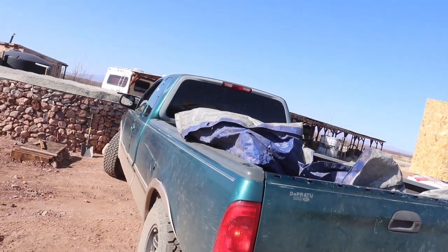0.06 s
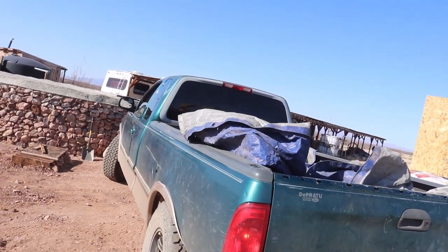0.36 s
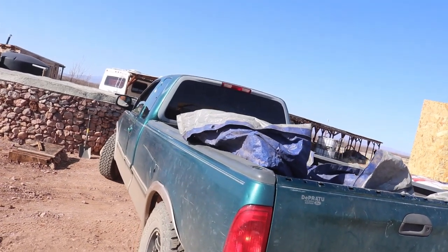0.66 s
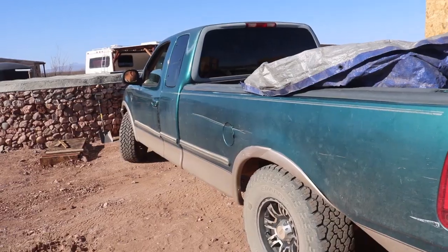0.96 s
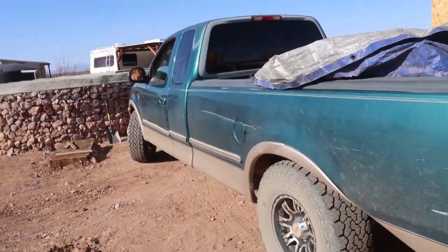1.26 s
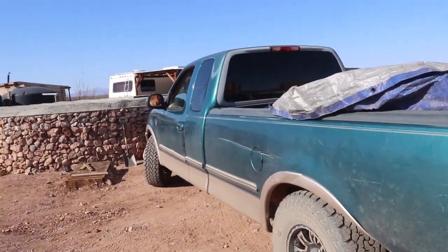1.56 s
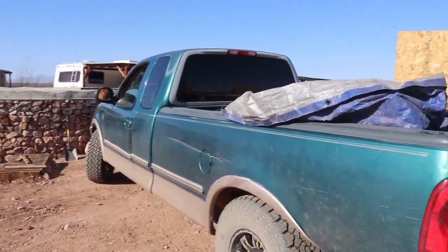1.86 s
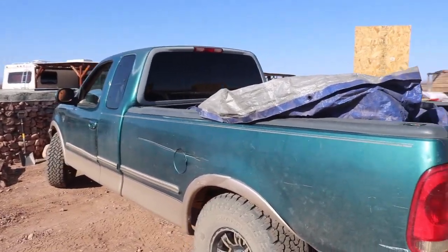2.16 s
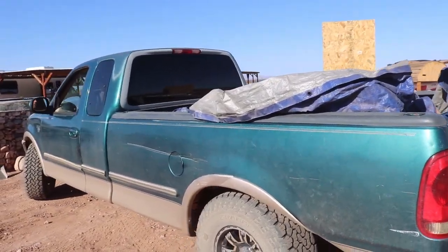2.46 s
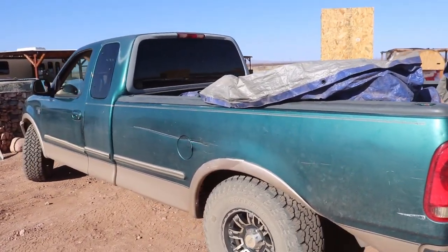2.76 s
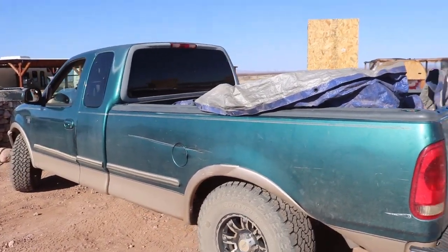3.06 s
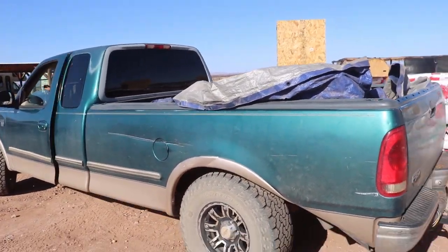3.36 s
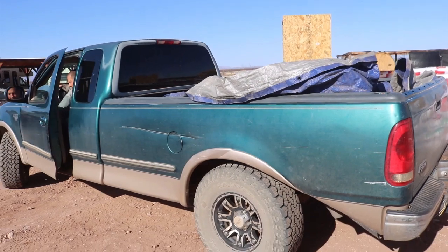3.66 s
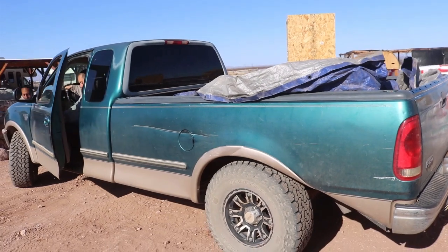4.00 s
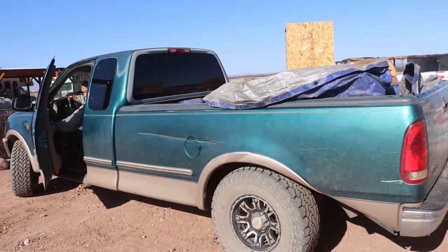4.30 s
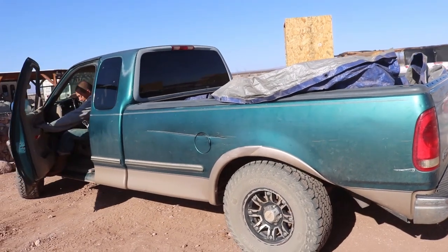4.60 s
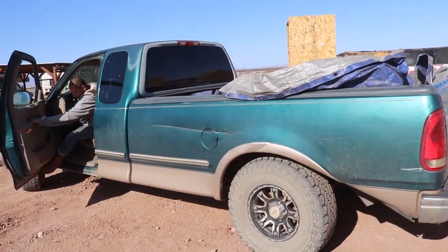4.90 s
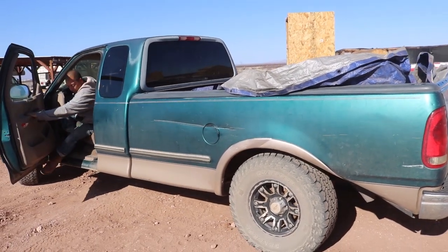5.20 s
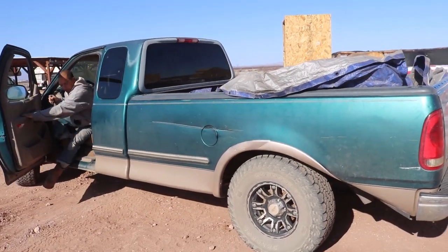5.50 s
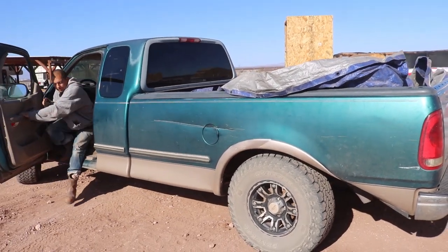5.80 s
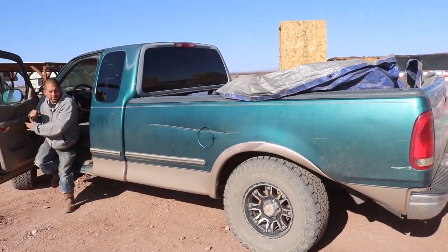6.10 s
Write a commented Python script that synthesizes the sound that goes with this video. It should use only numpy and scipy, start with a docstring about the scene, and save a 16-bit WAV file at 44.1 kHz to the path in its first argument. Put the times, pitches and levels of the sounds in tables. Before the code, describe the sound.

A pickup's V8 idles and shuts off, then the door clicks open and the driver climbs out with knocks and rustling.

```python
"""A pickup stops and the driver gets out

A V8 idles in a desert yard, its exhaust puffs ringing the tailpipe, heard from behind and then
suddenly from the side. Switched off, it shudders to rest. The door unlatches and its hinge squeaks.
The driver slides out with knocks, rubbing clothes and jingling keys as wind brushes the microphone."""
import sys
import numpy as np
from scipy import signal
from scipy.io import wavfile
from scipy.ndimage import uniform_filter1d

SR = 44100
rng = np.random.default_rng(int(sys.argv[2]) if len(sys.argv) > 2 else 0)


def to_wav(s):
    """Save 16-bit WAV."""
    ch = np.atleast_2d(s).T  # columns
    pcm = np.round(np.clip(ch, -1, 1) * 32767)  # PCM
    wavfile.write(sys.argv[1], SR, pcm.astype(np.int16))


N = 275625
TIME = np.arange(N) / SR

# Levels are relative. A ring_s or decay_s is the time a sound takes to fade by 60 dB.
# Tone of the quiet yard, and of the wind's rumble: frequency_hz, level_db
YARD_TONE = [(15, -22.5), (25, -15.5), (80, -9.5), (134, -16), (206, -16.5), (560, -17), (695, -23.5),
             (796, -19.5), (962, -22), (1160, -27), (2220, -29), (2910, -28.5), (4030, -36.5), (16000, -41)]
WIND_TONE = [(12, -36), (20, -9.5), (32, 3.5), (51, 1), (76, 0.5), (173, -11.5), (340, -34.5), (520, -58.5)]
# Gusts on the microphone: peak_s, half_length_s, level_db
GUSTS = [(3.9, 0.061, -50), (5.203, 0.092, -27), (5.33, 0.022, -34), (5.43, 0.066, -32.5),
         (5.77, 0.18, -40.5), (6.045, 0.19, -44), (6.24, 0.09, -36)]

# The driver turns, pushes the door, shifts and steps down: peak_s, half_length_s, scuff_db, hiss_db
MOVES = [(3.086, 0.1, -44.5, -72), (3.37, 0.18, -47.5, -79), (3.677, 0.058, -41, -50.5),
         (4.241, 0.021, -45, -48), (4.45, 0.19, -45, -55.5), (4.61, 0.033, -56, -43.5),
         (4.774, 0.1, -39.5, -46.5), (4.935, 0.084, -47.5, -53.5), (5.325, 0.19, -47, -52.5),
         (5.993, 0.24, -42.5, -49)]
# Tone of scuffing on the seat, and of hissing cloth: frequency_hz, level_db
SCUFF_TONE = [(88, -40), (150, 1.5), (254, -2.5), (403, -5), (1430, -18.5), (1620, -32.5), (3040, -16),
              (3780, -47), (4270, -37), (6000, -70), (7800, -63), (13200, -120)]
CLOTH_TONE = [(2000, 18), (3500, 11.5), (7000, 5), (11000, -1.5), (16000, -10)]
# Keys touching: start_s, level_db, ring_offset_db, pitch_hz
KEY_TOUCHES = [(3.488, -35.5, -24, 11600), (5.174, -37, -18, 13900), (5.193, -38, -7, 13800),
               (5.254, -39, -6, 13300), (5.271, -45, -1, 13300), (5.305, -37, -16, 12900),
               (5.358, -42, -9, 11900), (5.478, -36, -10, 8600), (5.488, -31, -12, 12450)]
# A key's modes (the notes it rings with): pitch_multiple, level_db, ring_s
KEY_MODES = [(1, -3, 0.075), (.41, -10, .05), (.52, -6.5, 0.061), (.68, -10, .06), (.88, -11, .06)]

# Dull blows on the cab: start_s, level_db, cutoff_hz, panel_pitch_hz
THUMPS = [(2.576, -19, 206, 147.4), (2.644, -28.5, 230, 137), (3.253, -25, 300, 140),
          (3.375, -21.5, 190, 168), (4.366, -23, 169, 128), (4.425, -26, 260, 155),
          (4.706, -7.5, 490, 136.8), (4.714, -11, 304, 128.7), (4.855, -15, 190, 129),
          (4.983, -22, 119, 126), (6.131, -21, 330, 143.6)]
# Modes of a cab panel: pitch_multiple, level_db, ring_s
CAB_MODES = [(.68, -11, 0.12), (1, 2, 0.12), (1.36, -4, 0.058), (1.96, -8, 0.11), (2.26, -16, 0.075),
             (3.2, -25, 0.23), (4.7, -6.5, 0.045), (6.24, -15, 0.082)]
# Clacks of grit, latch, door stay, trim and boots:
# start_s, level_db, decay_s, ring_hz, ring_offset_db, snap_offset_db, snap_cutoff_hz
CLACKS = [(0.471, -34, 0.038, 2780, 5, -16.5, 5000), (1.3226, -10, 0.012, 1120, 3, 1, 12000),
          (1.326, -26, 0.0067, 1200, 2, -2, 14000), (1.872, -32.5, 0.06, 1380, -4, -14, 6000),
          (1.954, -34, 0.068, 1160, -6, -20, 6000), (2.077, -34.5, 0.039, 850, -11, -24, 6100),
          (3.073, -30.5, 0.16, 1450, -4, -8.5, 7000), (3.1, -25, 0.11, 2900, -8.5, -9, 4500),
          (3.253, -37.5, 0.3, 510, 4, -16, 5960), (3.283, -27, 0.055, 2700, -3, -5, 9000),
          (3.288, -37.5, 0.12, 590, 6.5, -11, 6000), (3.659, -21, 0.12, 406, -2, -8, 9000),
          (3.665, -27.5, 0.097, 3280, -13, -1, 13000), (3.69, -34, 0.055, 2260, 2, -2, 10000),
          (3.707, -44, 0.03, 3000, -2, -4, 6000), (3.72, -38, 0.03, 3100, -6, -6, 5000),
          (3.773, -30.5, 0.052, 1730, -5.5, -21, 4000), (3.803, -38, 0.027, 2800, 0, -8, 5000),
          (3.929, -44, 0.092, 2960, -3.5, -2, 5000), (4.229, -42.5, 0.18, 3170, -8, -5, 4500),
          (4.322, -26, 0.052, 460, -3, -9, 6000), (4.328, -22.5, 0.1, 2010, -9, -16, 6000),
          (4.346, -29.5, 0.065, 960, -4, -10, 6000), (4.361, -33.5, 0.06, 428, -10, -7, 7000),
          (4.422, -25, 0.038, 950, -5, -22, 4000), (4.468, -38.5, 0.07, 1070, -4, -24, 4000),
          (4.51, -35, 0.05, 620, 1, -20, 4000), (4.518, -32, 0.05, 1300, -3, -14, 5000),
          (4.558, -35.5, 0.063, 1030, 4, -3, 7000), (4.569, -31, 0.13, 810, -2, -12, 6000),
          (4.706, -31.5, 0.12, 770, 4.5, -28, 5000), (4.715, -34, 0.1, 2450, -18, -9, 7000),
          (4.737, -28.5, 0.06, 1173, -1, -12, 7000), (4.753, -30.5, 0.12, 2700, -13, -13, 9000),
          (4.848, -32, 0.16, 550, -3.5, -27, 7000), (5.274, -31.5, 0.12, 1370, -3, -24, 5000),
          (5.466, -27, 0.063, 935, -6.5, -26, 5000), (5.913, -35, 0.028, 1930, -2, -22, 4000),
          (5.942, -28.5, 0.027, 403, -2.5, -20, 4000), (5.954, -32, 0.045, 970, 8.5, -26, 4000),
          (6.081, -24, 0.072, 1550, -14, -14, 6000), (6.096, -41, 0.16, 403, 11, -24, 4000),
          (6.131, -38.5, 0.027, 1090, -1, -24, 4000)]
# The door's noisy answer to a clack: frequency_hz, level_db, decay_multiple
DOOR_TONE = [(88.6, 14, 1.5), (184, -12.5, 1.5), (360, 10, 1.3), (785, 1.5, 1.1), (1670, -8, 1),
             (2130, -11, 1), (3020, -5.5, 1), (4600, -63, .9), (8000, -52, .8)]
# Tone of hard edges snapping together: frequency_hz, level_db
SNAP_TONE = [(2000, 13), (3500, 9.5), (6000, 6.5), (9000, 4.5), (12500, -4), (16000, 2)]
# The latch lets go and the stay (the arm that holds the door open) catches: start_s, level_db
DOOR_KNOCKS = [(3.659, -22.5), (3.671, -27.5), (4.323, -26)]
# Modes of the hollow door: pitch_hz, level_db, ring_s
DOOR_MODES = [(130, -23, 0.5), (262, -9, 0.27), (330.4, -4.5, 0.24), (412, -1, 0.13), (465, -11, 0.15),
              (555, -24, 0.061)]
# Rattles of the steel latch and stay: start_s, level_db, pitch_hz
RATTLES = [(3.103, -34, 2980), (3.292, -29, 3140), (3.662, -24, 2970), (4.329, -41, 3150),
           (4.352, -33, 3290), (4.516, -43, 3210), (4.752, -49, 2880)]
# Modes of those steel parts: pitch_multiple, level_db, ring_s
STEEL_MODES = [(.7, -11, 0.025), (.88, -11, .025), (1, -5, 0.04), (1.08, -9, 0.024), (1.34, -18, .025),
               (1.7, -19, 0.025), (2.06, -19, 0.025)]

# Jolts as the engine stalls and settles: start_s, level_db
SHUDDERS = [(1.536, -3.5), (1.58, -4), (1.639, -2.5), (1.7, -7), (1.727, -7.5), (1.784, -9.5), (1.898, -15),
            (1.96, -22), (2.006, -17.5), (2.09, -26.5), (2.419, -33.5)]
# Modes of the shaken truck: pitch_hz, level_db, ring_s
TRUCK_MODES = [(55.2, -8.5, 0.8), (99.4, -2, 0.14), (121, -8, 0.049), (229, -16, 0.16), (379, -9, 0.099)]
# Tone of the whirr under the bonnet: frequency_hz, level_db
WHIRR_TONE = [(350, -40), (600, 3), (961, -5), (1150, -9), (1360, 0.5), (1580, -13), (2340, -1.5),
              (2820, -17.5), (3190, -16), (3600, -20.5), (4460, -43.5), (8640, -98), (15000, -59.5)]
# The tailpipe's three honks in each engine cycle: delay_s, pitch_hz, behind_db, beside_db
HONKS = [(-.036, 420, -21.5, -30), (.007, 376, -14, -15.5), (.05, 520, -25.5, -26)]
# The eight cylinders in firing order, from each listening spot. A puff has a low boom, a middle
# bark and a higher rasp: lateness_in_firing_gaps, boom_db, bark_db, rasp_db
CYLINDERS_BEHIND = [(0.07, 8.5, 1.7, 1.4), (0.32, -0.8, 4.4, 4.8), (0.09, 6.5, 2.5, 2.1),
                    (-0.07, -9.4, -4.4, -2.3), (0.01, -11.3, 5.7, 5.5), (-0.03, 6.5, -3.2, -2.5),
                    (0.04, -20.7, 0.9, 1.9), (0.04, 1.4, 0.8, 1.1)]
CYLINDERS_BESIDE = [(0.04, 9.3, 3.84, -6.68), (0.16, -2.21, 1.79, 1.11), (0.15, 1.74, -0.26, 1.4),
                    (0.07, 8.21, -0.09, 9.68), (-0.46, -6.1, -11.29, 6.91), (0.04, -0.48, 0.22, -1.57),
                    (-0.05, 2.36, 2.58, -3.56), (0.04, -12.82, 3.21, -7.29)]
# Exhaust pipe resonances from each spot: pitch_hz, width_hz, level_db, part (0 boom, 1 bark, 2 rasp)
PIPE_BEHIND = [(73.2, 16.3, 1.5, 0), (81.8, 30, -11, 0), (123.1, 14.5, 13.5, 0), (122.4, 33, 5, 0),
               (169.7, 19, -8, 1), (230.1, 6.9, -6, 1), (342.9, 29.2, 12, 1), (340.8, 40.4, 10.5, 1),
               (412.6, 44.7, 9, 1), (410.2, 42.5, 8.5, 1), (488, 19, -10.5, 2)]
PIPE_BESIDE = [(76, 35, -8, 0), (133, 19.2, 1.5, 0), (183, 44, -13.5, 0), (206.8, 30.4, 0, 1),
               (312.7, 18.4, -1, 1), (331, 15.7, -2, 1), (407, 19.3, -6, 1), (495.5, 25, -7, 2),
               (565, 70, -25, 2)]

IDLE_BEHIND_HZ, IDLE_BESIDE_HZ = 7.395, 8.43  # engine cycles a second, eight puffs in each
MOVE_BESIDE_S, IGNITION_OFF_S, DOOR_OPEN_S = 0.8666, 1.42, 4.2
FADE_60_DB = -np.log(1000)  # exp() of this is a drop of 60 dB


def from_db(db):
    """Turn decibels into a number to multiply by."""
    return 10 ** (np.asarray(db) / 20)


def unit_level(x):
    """Scale a signal to an average (rms) level of 1."""
    return x / np.sqrt(np.mean(x ** 2) + 1e-20)


def at_hz(table, hz, column=1):
    """Read between a table's rows, spacing frequencies by octaves."""
    table = np.array(table)
    return np.interp(np.log(hz), np.log(table[:, 0]), table[:, column])


def drift(rate_hz):
    """A random wobble of about 1 up and down."""
    return unit_level(np.interp(TIME * rate_hz, np.arange(4096), rng.standard_normal(4096)))


def swell(peak_s, rise_s, fall_s):
    """A smooth rise to 1 and a smooth fall."""
    distance = (TIME - peak_s) / np.where(TIME < peak_s, rise_s, fall_s)
    return np.exp(-np.minimum(distance ** 2, 20))


def filtered(x, hz, kind, order=2):
    """Keep the "low" part, the "high" part or one "band" of a sound."""
    sections = signal.butter(order, np.clip(hz, 10, .45 * SR), kind, fs=SR, output="sos")
    return signal.sosfilt(sections, x + 1e-18)


def bands(low_hz, high_hz):
    """Half-octave slices of noise, each paired with its centre frequency."""
    white = rng.standard_normal((2, N))
    edges = 17 * 2 ** np.arange(0, 10.5, .5)
    return [(np.sqrt(low * high), filtered(white[k % 2], [low, high], "band"))
            for k, (low, high) in enumerate(zip(edges, edges[1:])) if high > low_hz and low < high_hz]


def noise(tone, flicker_db):
    """Noise shaped by a tone table; each band can flicker on its own."""
    return unit_level(sum(band * from_db(at_hz(tone, hz) + flicker_db * drift(25))
                          for hz, band in bands(tone[0][0], tone[-1][0])))


def resonate(x, hz, width_hz):
    """Make a sound ring at one pitch; a narrower width rings longer."""
    r = np.exp(-np.pi * width_hz / SR)
    feedback = [1, -2 * r * np.cos(2 * np.pi * hz / SR), r * r]
    return signal.lfilter(np.array([1, 0, -1]) * (1 - r * r) / 2, feedback, x + 1e-18)


def pitched_noise(hz, width_hz, length=N):
    """Noise narrowed twice around one pitch."""
    return resonate(resonate(rng.standard_normal(length), hz, width_hz), hz, width_hz)


def tuned(modes, pitch_hz, detune=0):
    """Set a part's modes to a pitch; where it is touched shifts all but the main one."""
    return [(pitch_hz * multiple * (1 + (multiple != 1) * detune * rng.normal()), db, ring_s)
            for multiple, db, ring_s in modes]


def strike(modes, level_db, vary_db=1.5):
    """A struck object rings with fading notes, in a slightly new balance each time."""
    t = np.arange(SR // 2) / SR
    return sum(from_db(level_db + db + vary_db * rng.normal())
               * np.exp(FADE_60_DB * t / ring_s) * np.sin(2 * np.pi * hz * t)
               for hz, db, ring_s in modes)


def add(track, start_s, sound):
    """Mix a sound into a track at a given time."""
    start = int(start_s * SR)
    track[start:start + len(sound)] += sound[:max(N - start, 0)]


def air(breeze_db=-55.5, whine_hz=959):
    """The quiet yard, gusts of wind, and a faint whine after the engine stops."""
    whine = unit_level(resonate(resonate(rng.standard_normal(N), whine_hz, 35), whine_hz, 24.5))
    whine *= from_db(-61) * swell(peak_s=2.8, rise_s=.24, fall_s=.4)
    yard = from_db(-50.5) * noise(YARD_TONE, flicker_db=0)
    gusts = sum(from_db(db) * swell(peak_s, half_s, half_s) for peak_s, half_s, db in GUSTS)
    wind = (from_db(breeze_db) + gusts) * noise(WIND_TONE, flicker_db=3)
    return yard + wind + whine


def with_wall_echo(x, delay_s=0.037, echo_db=-19):
    """A stone wall sends back one dull echo."""
    delayed = np.interp(TIME - delay_s, TIME, x, left=0)
    return x + from_db(echo_db) * filtered(delayed, 3000, "low")


def movement():
    """How strongly the driver's clothes scuff and hiss as each move swells and fades."""
    return sum(np.outer(from_db([scuff_db, hiss_db]), swell(peak_s, half_s, half_s))
               for peak_s, half_s, scuff_db, hiss_db in MOVES)


def clothes():
    """Clothes drag over the seat in uneven little catches."""
    scuff, hiss = movement()
    scuff *= noise(SCUFF_TONE, flicker_db=1.5)
    hiss *= from_db(-4) * noise(CLOTH_TONE, flicker_db=3)
    catches = from_db(2.0 * drift(200) + 4.2 * drift(30))
    return (scuff + hiss) * catches


def keys(tick_db=-11, tick_decay_s=.05):
    """Keys touch with a dry tick and a small, bright ring."""
    out, t = np.zeros(N), np.arange(SR // 2) / SR
    for start_s, db, ring_db, pitch_hz in KEY_TOUCHES:
        tick = filtered(rng.standard_normal(len(t)), 2430, "high") * np.exp(FADE_60_DB * t / tick_decay_s)
        ring = strike(tuned(KEY_MODES, pitch_hz, detune=.06), db + ring_db, vary_db=2)
        add(out, start_s, ring + from_db(db + tick_db) * tick)
    return out


def cab_thumps(nudge_db=-3, nudge_cutoff_hz=284, nudge_pitch_hz=132.4):
    """Blows ring the cab's panels; a softer blow wakes fewer of the high notes."""
    out = np.zeros(N)
    # Once the door is open, each clack is a knock from the driver that also nudges the cab.
    nudges = [(start_s, db + nudge_db, nudge_cutoff_hz, nudge_pitch_hz)
              for start_s, db, *_ in CLACKS if start_s > DOOR_OPEN_S]
    for start_s, db, cutoff_hz, pitch_hz in THUMPS + nudges:
        ring = strike(tuned(CAB_MODES, pitch_hz), db)
        add(out, start_s, filtered(ring, cutoff_hz, "low"))
    return filtered(out, 149, "high", order=3)  # panels give off little deep bass


def trim_ticks(peak_per_s=12, level_db=-50, decay_s=0.04, ring_range_hz=(890, 3260)):
    """The trim ticks at random while the driver moves; gives rows like those of CLACKS."""
    effort = movement()[0]
    chance, pitch = rng.random((2, N))
    ticking = chance < peak_per_s / SR * (effort / effort.max()) ** 2
    return [(i / SR, level_db, decay_s, np.interp(pitch[i], [0, 1], ring_range_hz), -2, -11, 6000)
            for i in np.flatnonzero(ticking)]


def clacks(rise_s=0.00091):
    """Loose parts chatter for an instant: the door sounds, one part rings most, hard edges snap."""
    out, t = np.zeros(N), np.arange(SR // 4) / SR
    panel = [(band * from_db(at_hz(DOOR_TONE, hz)), at_hz(DOOR_TONE, hz, column=2))
             for hz, band in bands(100, 8000)]
    panel_level = np.std(sum(band for band, _ in panel))
    snap = noise(SNAP_TONE, flicker_db=1)
    chatter = from_db(2.1 * drift(500))
    attack = 1 - np.exp(-t / rise_s)
    for start_s, db, decay_s, ring_hz, ring_db, snap_db, cutoff_hz in CLACKS + trim_ticks():
        piece = int(rng.random() * (N - len(t))) + np.arange(len(t))  # a random stretch of the noise
        fade = FADE_60_DB * t / decay_s
        body = sum(band[piece] * np.exp(fade / longer) for band, longer in panel) / panel_level
        width_hz = 220 - FADE_60_DB / decay_s  # a shorter blow has a less clear pitch
        ring = unit_level(pitched_noise(ring_hz, width_hz, len(t))) * np.exp(fade)
        edge = filtered(snap[piece], cutoff_hz, "low") * np.exp(fade * 1.73)
        blow = body + from_db(ring_db) * ring + from_db(snap_db) * edge
        add(out, start_s, from_db(db) * blow * chatter[piece] * attack)
    return out


def door(touches=6, gap_s=.0035, loss_db=1.8, detune=.045):
    """The hollow door knocks, and its steel parts rattle in runs of quick, weakening touches."""
    out = np.zeros(N)
    for start_s, db in DOOR_KNOCKS:
        add(out, start_s, strike(DOOR_MODES, db))
    for start_s, db, pitch_hz in RATTLES:
        for k in range(touches):
            modes = tuned(STEEL_MODES, pitch_hz * (1 + detune * rng.normal()), detune)
            touch_s = start_s + gap_s * (k + rng.uniform(-.3, .3))
            add(out, touch_s, strike(modes, db - k * loss_db, vary_db=2))
    return out


def hinge_squeak(peak_s=4.009, rise_s=.009, fall_s=.010, top_hz=2075, glide_hz_per_s=4500):
    """The hinge sticks and slips in a short, rough, rising squeak, then rings on faintly."""
    glide_left_s = np.clip(peak_s + rise_s - TIME, 0, 2 * (rise_s + fall_s))
    pitch_hz = (top_hz - glide_hz_per_s * glide_left_s) * (1 + .022 * drift(600))
    phase = 2 * np.pi * np.cumsum(pitch_hz) / SR
    level = swell(peak_s, rise_s, fall_s)
    brightness = from_db(-5.5) * level ** 0.3  # more overtones when louder
    slip = sum(np.sin(k * phase) * brightness ** (k - 1) * from_db(3 * drift(500)) for k in range(1, 5))
    ring = np.sin(2 * np.pi * top_hz * TIME) * from_db(3 * drift(150))
    return from_db(-42) * level * slip + from_db(-50) * swell(peak_s, rise_s, fall_s=0.045) * ring


def hinge_groan(peak_s=4.47, half_s=.11, centre_hz=370, glide_hz_per_s=400):
    """The dry hinge sticks and slips more slowly, its low note rising as the door swings wide."""
    pitch_hz = (centre_hz + glide_hz_per_s * (TIME - peak_s)) * (1 + 0.0505 * drift(150))
    level = from_db(-45 + 3 * drift(80)) * swell(peak_s, half_s, half_s)
    return level * np.sin(2 * np.pi * np.cumsum(pitch_hz) / SR)


def engine_speed(t, slowing_hz_per_s=10.0):
    """Speed as a share of idle: with the ignition off, friction slows the engine evenly."""
    return np.clip(1 - (t - IGNITION_OFF_S) * slowing_hz_per_s / IDLE_BESIDE_HZ, 1e-4, 1)


def count_cycles(idle_hz, zero_s):
    """Engine cycles turned since zero_s; begins a second early so the pipe is already ringing."""
    t = np.arange(-SR, N) / SR
    cycles = np.cumsum(idle_hz * engine_speed(t)) / SR
    return cycles - np.interp(zero_s, t, cycles)


def shudder():
    """The stalling engine jolts the whole truck."""
    out = np.zeros(N)
    for start_s, db in SHUDDERS:
        add(out, start_s, strike(TRUCK_MODES, db))
    return filtered(out, [72, 290], "band")


def belt_chirps(cycles, per_cycle=6, depth_db=4, pitches_hz=(1820, 2826)):
    """The turning belt drive chirps in short, uneven bursts that start sharply."""
    burst_db = depth_db * (1 - 2 * (cycles * per_cycle % 1))
    return sum(unit_level(pitched_noise(hz, width_hz=380) * from_db(burst_db + 3 * drift(45)))
               for hz in pitches_hz)


def whirr(cycles, behind, shielding_db=-9.5):
    """Machinery whirrs, the belt chirps and gas rushes in the pipe, all fading as the engine slows."""
    machinery = noise(WHIRR_TONE, flicker_db=0.5)
    belt = from_db(-12) * belt_chirps(cycles)
    belt *= from_db(np.where(behind, 0, shielding_db))  # from the side, the body shields the belt
    gas = from_db(-10) * unit_level(filtered(rng.standard_normal(N), [200, 600], "band"))
    throb_db = 2.3 * behind * np.cos(2 * np.pi * (3 * cycles + .14))  # three belt throbs a cycle
    level = from_db(-33.5 + throb_db + 0.36 * drift(120)) * engine_speed(TIME) ** 1.7
    return (machinery + belt + gas) * level


def honk(hz, db, half_s=.021, sag_hz=30):
    """One swell of a tailpipe note, highest in pitch where it is loudest."""
    from_peak = np.arange(-2, 2, 1 / (half_s * SR))
    pitch_hz = hz * (1 + .015 * rng.normal()) - sag_hz * from_peak ** 2
    phase = 2 * np.pi * (np.cumsum(pitch_hz) / SR + rng.random())
    shape = np.exp(-from_peak ** 2) - np.exp(-4)
    return from_db(db + 0.5 * rng.normal()) * shape * np.sin(phase)


def exhaust(cycles, cylinders, pipe, gains_db, waver_s=.00016):
    """Eight unequal, unevenly spaced puffs a cycle ring the pipe: the lumpy beat of a V8."""
    uneven_db, unfired_db = (.9, 1.7, 2.2), (-4.5, -2.5, -13)  # boom, bark, rasp
    count = len(cylinders)
    firing = np.arange(np.ceil(cycles[0] * count) + 1, cycles[-1] * count - 1).astype(int)
    lateness, *levels_db = np.array(cylinders)[firing % count].T
    starts = np.searchsorted(cycles, (firing + lateness + .005 * rng.normal(size=len(firing))) / count)
    unfired = starts / SR - 1 > IGNITION_OFF_S + 1 / (count * IDLE_BESIDE_HZ)  # the last charge burns
    puffs = np.zeros((3, len(cycles)))
    for part in range(3):
        chance_db = uneven_db[part] * rng.normal(size=len(starts))
        puff_db = levels_db[part] + gains_db[part] + unfired * unfired_db[part] + chance_db
        puffs[part, starts] = from_db(puff_db)
    # Signs alternate, so close pairs of resonances cancel away from their peak.
    ringing = sum((-1) ** k * resonate(puffs[round(part)], hz, width_hz) * from_db(db)
                  for k, (hz, width_hz, db, part) in enumerate(pipe))
    muffled = filtered(ringing, 528, "low", order=3)  # the muffler swallows the treble
    muffled = filtered(muffled, 23, "high")[SR:]
    return np.interp(TIME + waver_s * drift(30), TIME, muffled)  # the gas in the pipe wavers


def engine(crossfade_s=0.0048, honk_lead_s=.042):
    """The V8 idles, heard from behind and then from the side, and dies away once switched off."""
    cycles_behind = count_cycles(IDLE_BEHIND_HZ, zero_s=.1196)
    cycles_beside = count_cycles(IDLE_BESIDE_HZ, zero_s=.0697)
    from_behind = exhaust(cycles_behind, CYLINDERS_BEHIND, PIPE_BEHIND, gains_db=(36.5, 33.5, 35.5))
    from_beside = exhaust(cycles_beside, CYLINDERS_BESIDE, PIPE_BESIDE, gains_db=(36.5, 34, 33))
    side_share = np.clip((TIME - MOVE_BESIDE_S) / crossfade_s, 0, 1)
    burble = from_behind + (from_beside - from_behind) * side_share
    behind = TIME < MOVE_BESIDE_S
    new_behind, new_beside = np.diff(np.floor([cycles_behind, cycles_beside]))[:, SR - 1:] > 0
    new_cycle = np.where(behind, new_behind, new_beside)
    for cycle_s in TIME[new_cycle & (TIME < IGNITION_OFF_S)]:
        for delay_s, hz, behind_db, beside_db in HONKS:
            db = behind_db if cycle_s < MOVE_BESIDE_S else beside_db
            add(burble, max(cycle_s + delay_s - honk_lead_s, 0), honk(hz, db))
    burble *= engine_speed(TIME) ** 1.61
    add(burble, MOVE_BESIDE_S, from_db(-13) * np.exp(-TIME / .0004))  # a faint tick as the spot jumps
    return burble + whirr(cycles_behind[SR:], behind) + shudder()


def scene():
    """Mix the truck, its door and the driver in the open air, in one channel."""
    motor = engine()
    knocks_and_squeaks = cab_thumps() + clacks() + door() + keys() + hinge_squeak() + hinge_groan()
    return (motor + with_wall_echo(knocks_and_squeaks) + clothes() + air())[None]


def record(dry, threshold_db=-19, share_removed=.4, average_s=.25, cutoff_hz=15900):
    """Turn loud stretches down a little, start softly and cut off the highest treble."""
    level_db = 10 * np.log10(uniform_filter1d(dry ** 2, int(average_s * SR)) + 1e-12)
    gain = from_db(-share_removed * np.maximum(level_db - threshold_db, 0))
    fade_in = np.minimum(TIME / .004, 1)
    treble_cut = signal.ellip(10, .1, 80, cutoff_hz, fs=SR, output="sos")
    return signal.sosfilt(treble_cut, dry * gain * fade_in)


dry = scene()
out = record(dry)
to_wav(out)
```